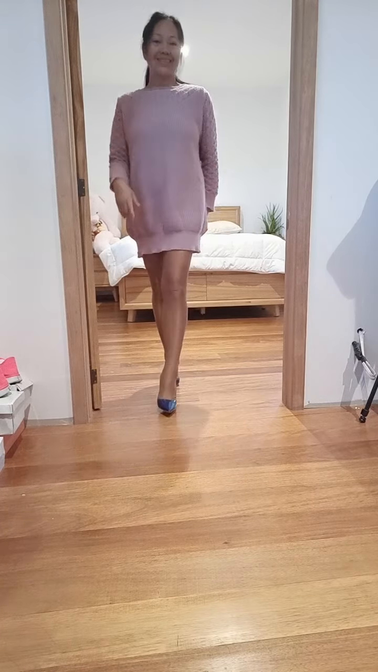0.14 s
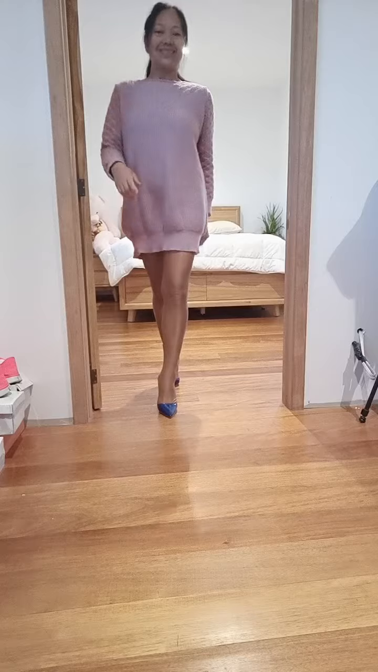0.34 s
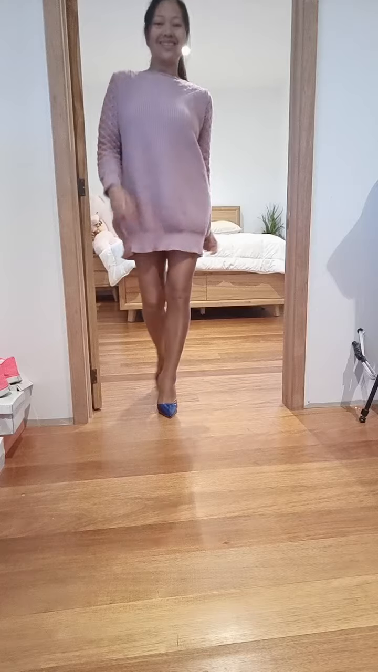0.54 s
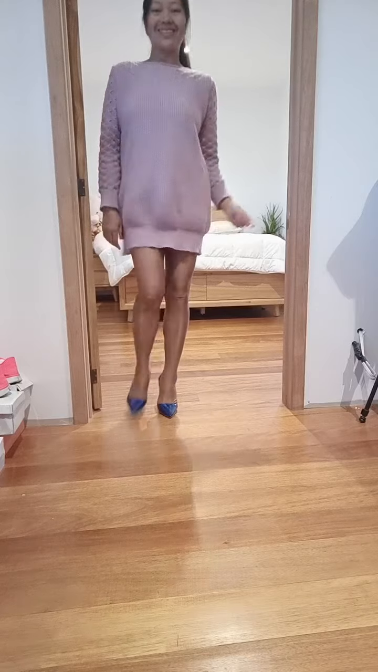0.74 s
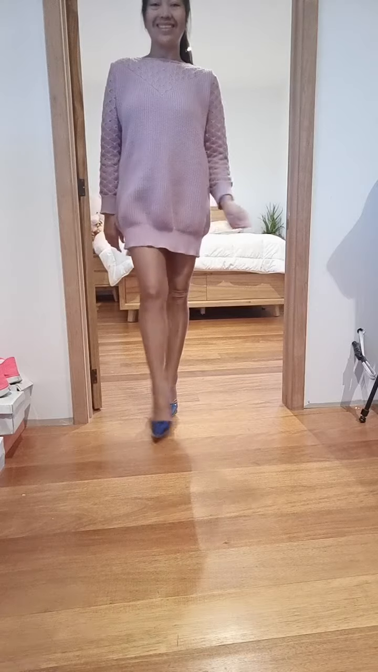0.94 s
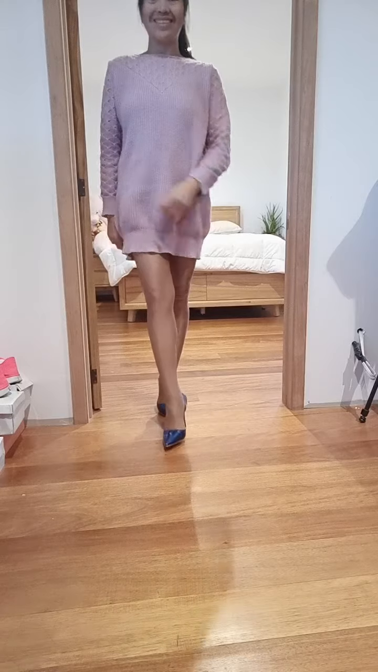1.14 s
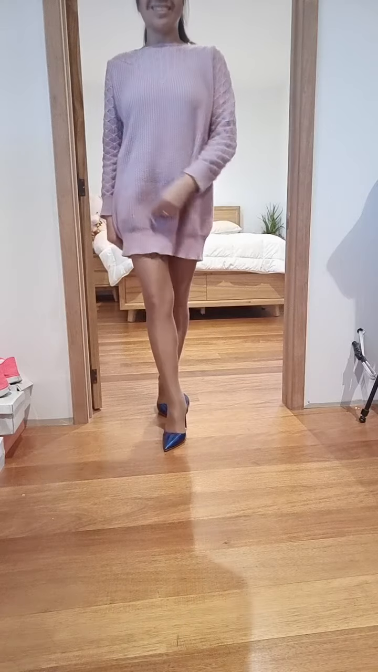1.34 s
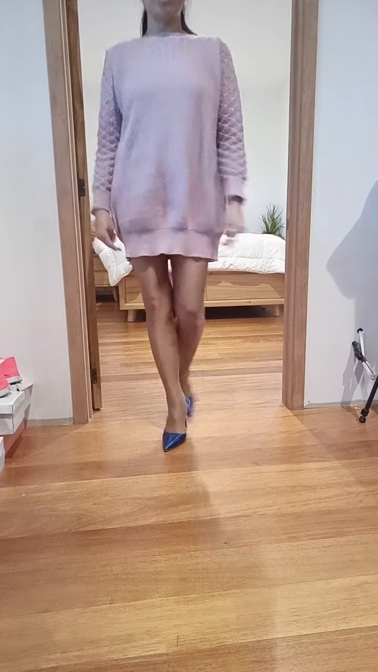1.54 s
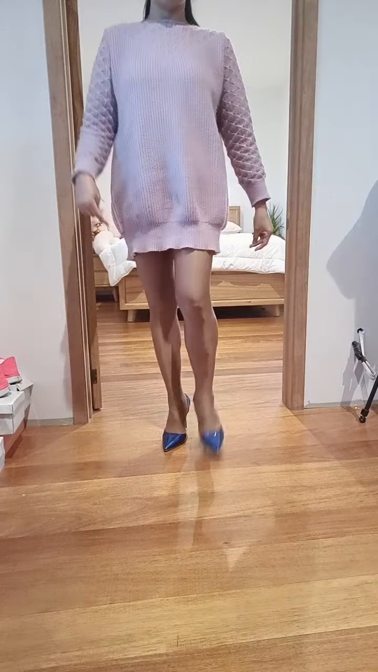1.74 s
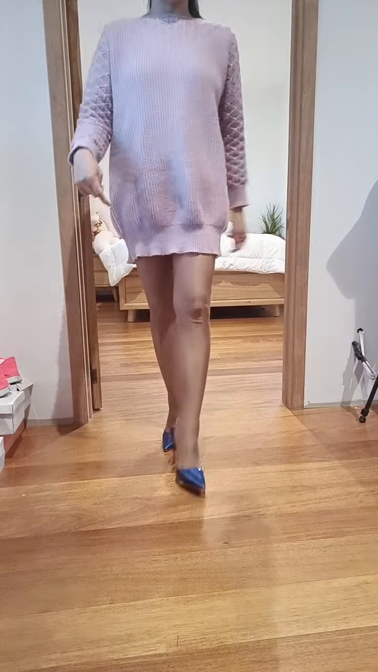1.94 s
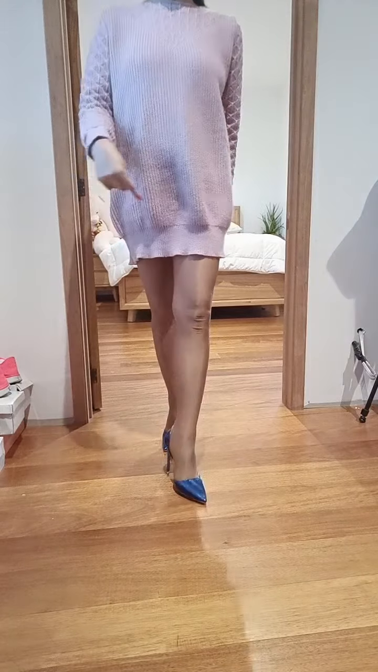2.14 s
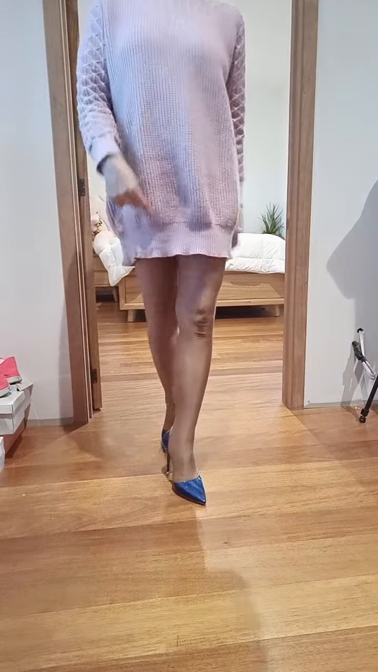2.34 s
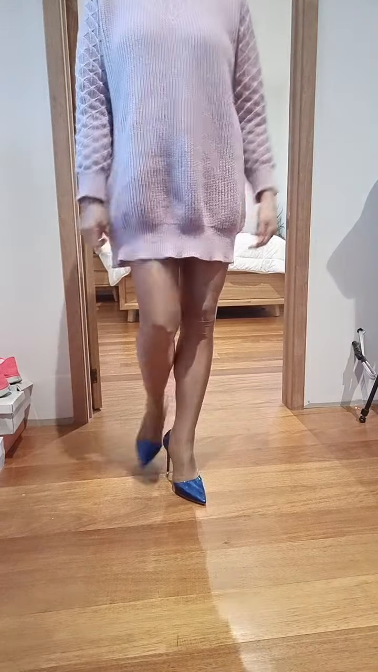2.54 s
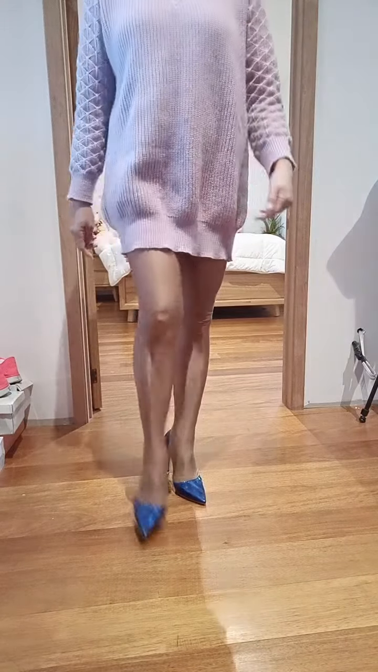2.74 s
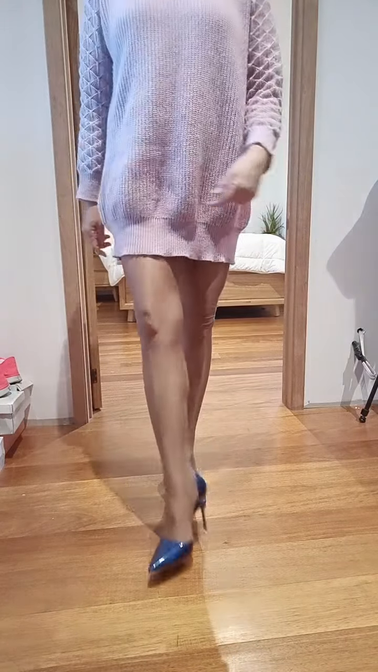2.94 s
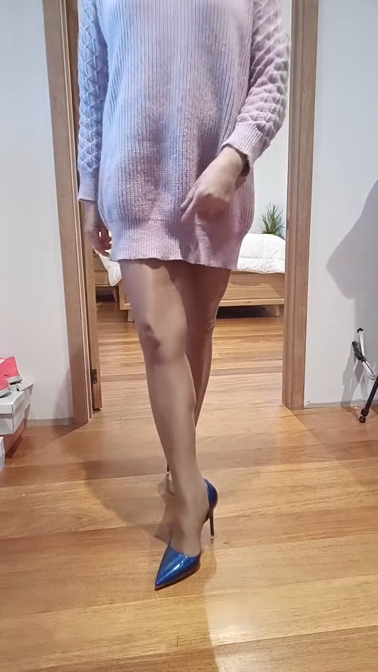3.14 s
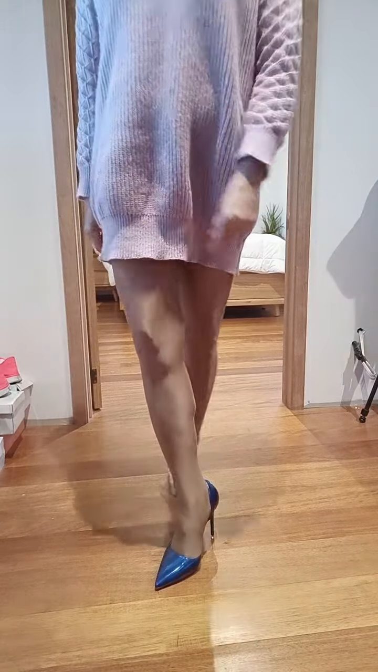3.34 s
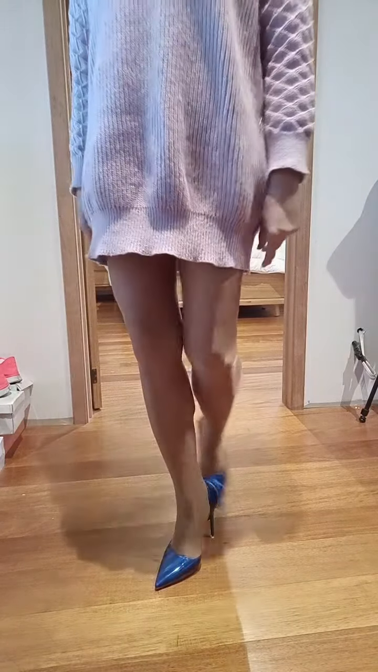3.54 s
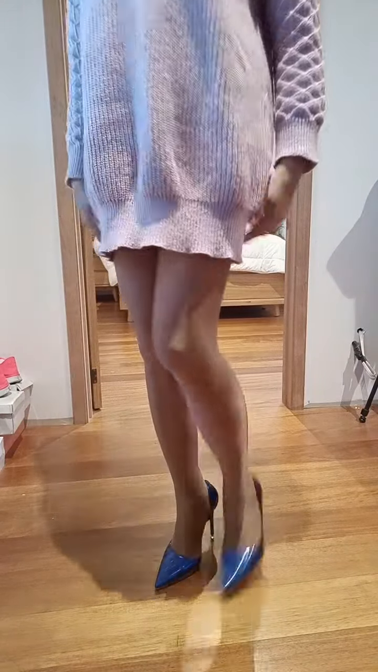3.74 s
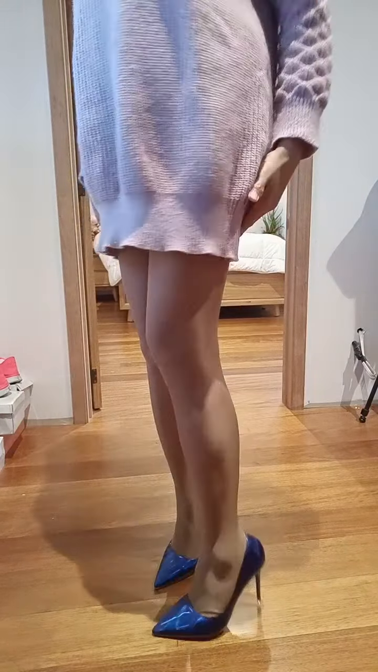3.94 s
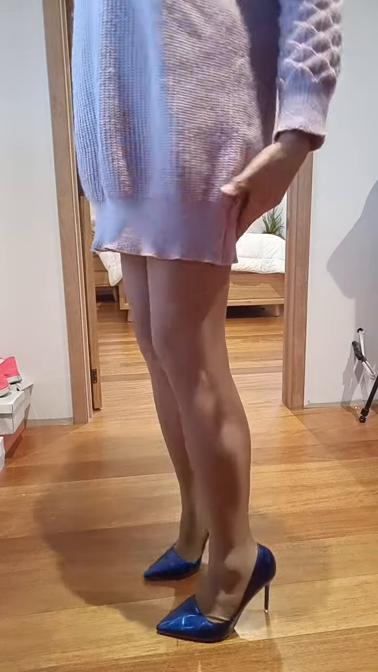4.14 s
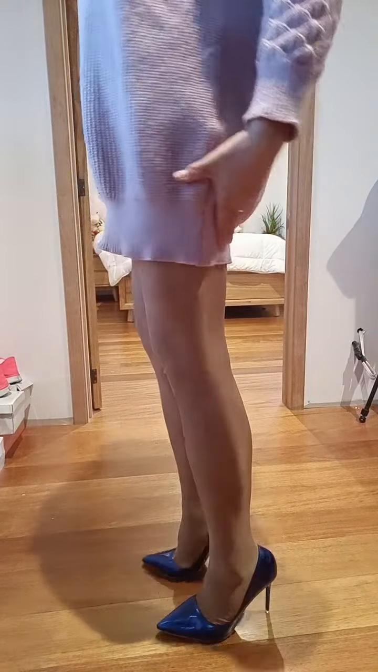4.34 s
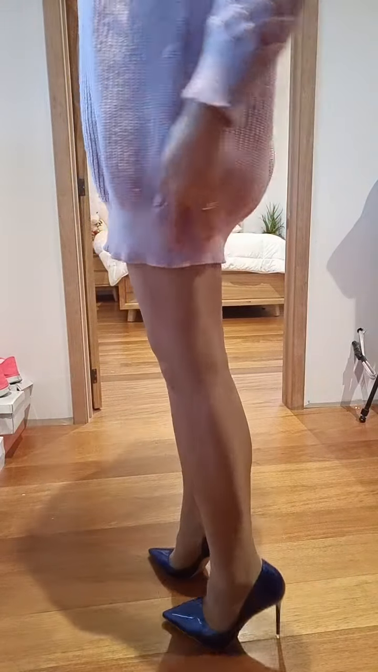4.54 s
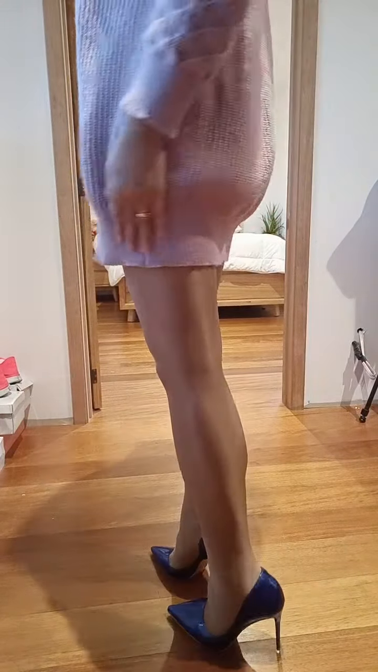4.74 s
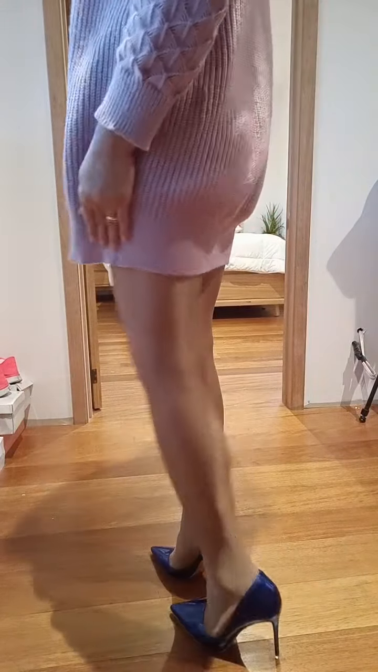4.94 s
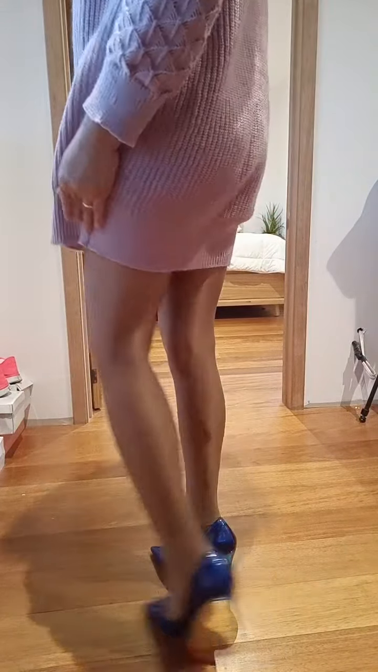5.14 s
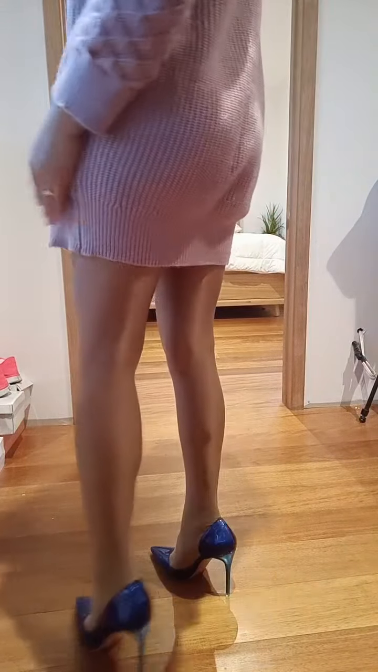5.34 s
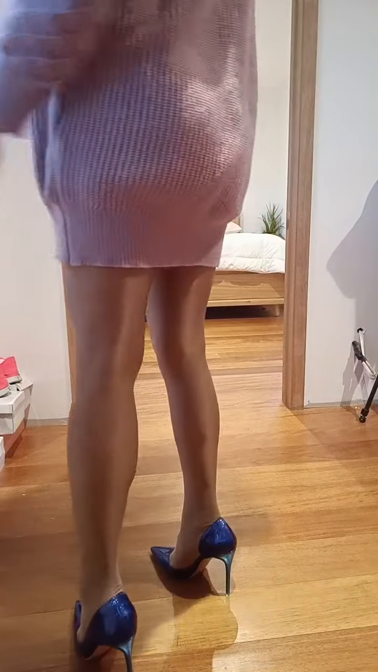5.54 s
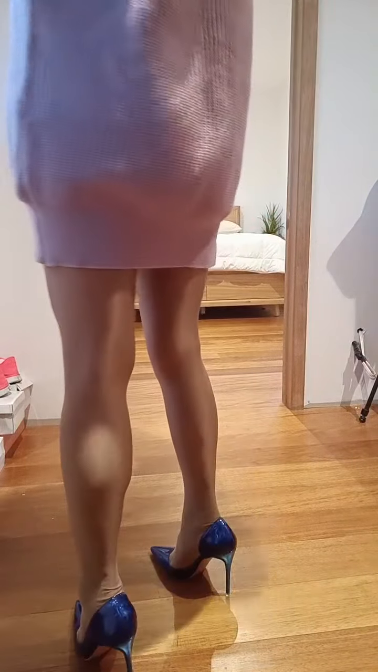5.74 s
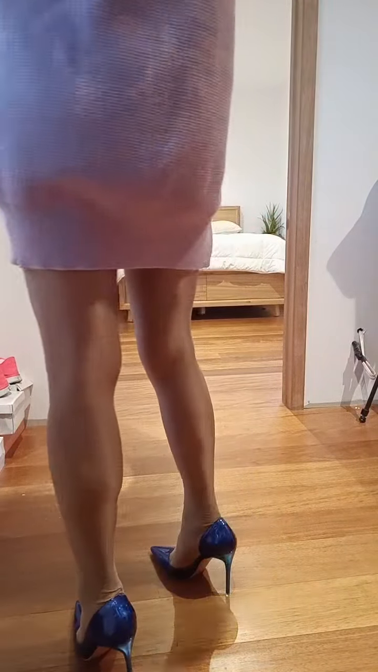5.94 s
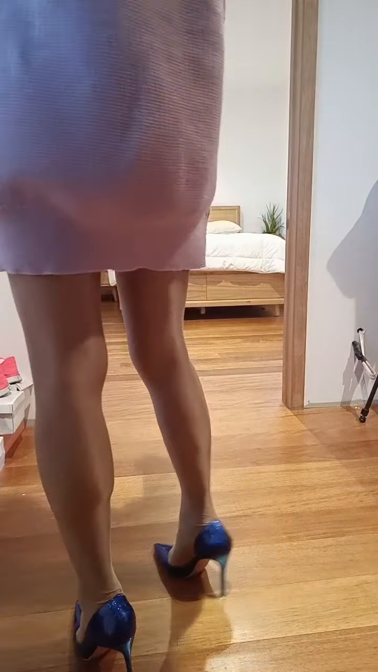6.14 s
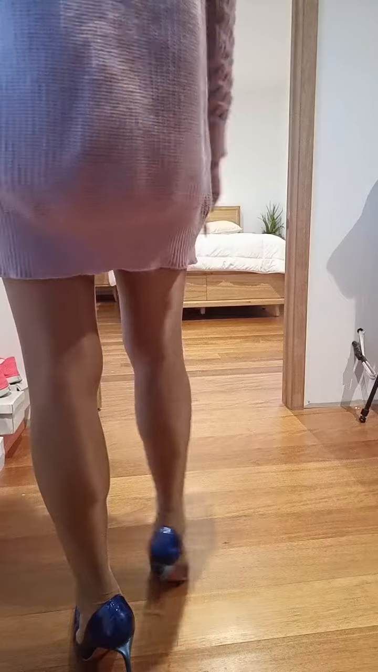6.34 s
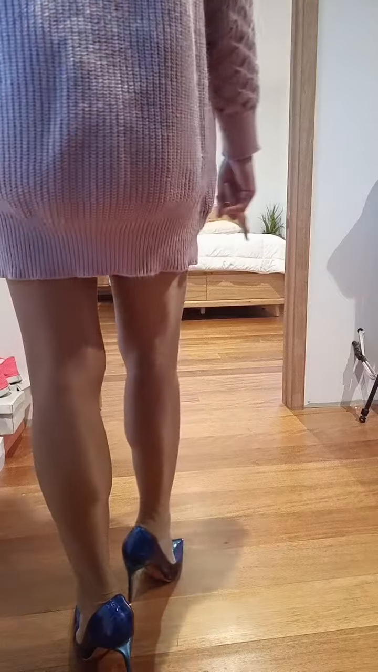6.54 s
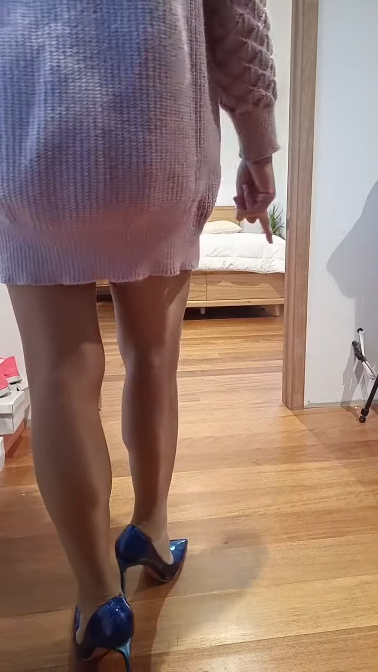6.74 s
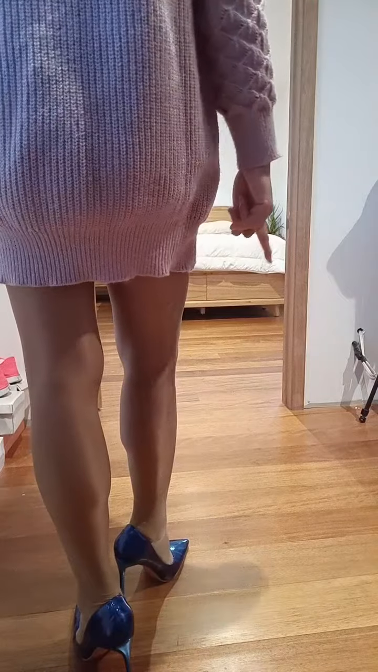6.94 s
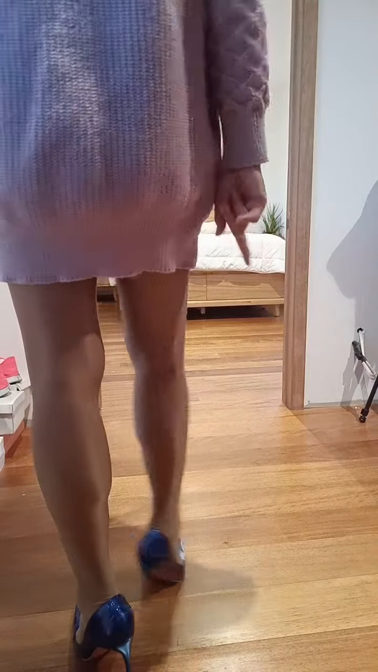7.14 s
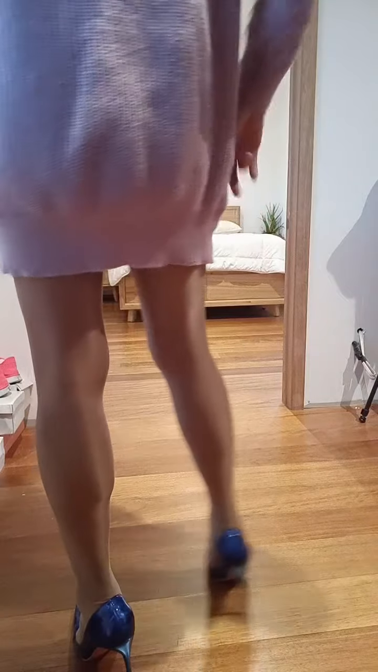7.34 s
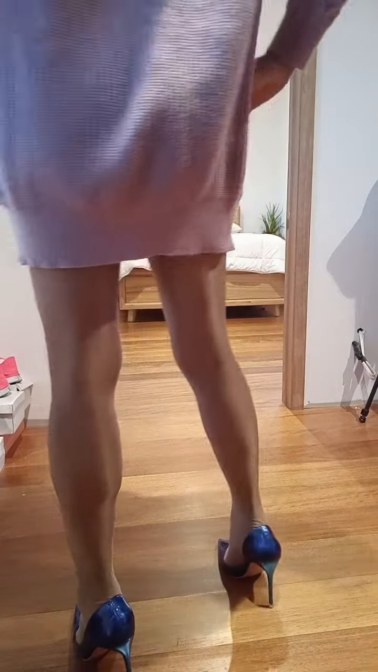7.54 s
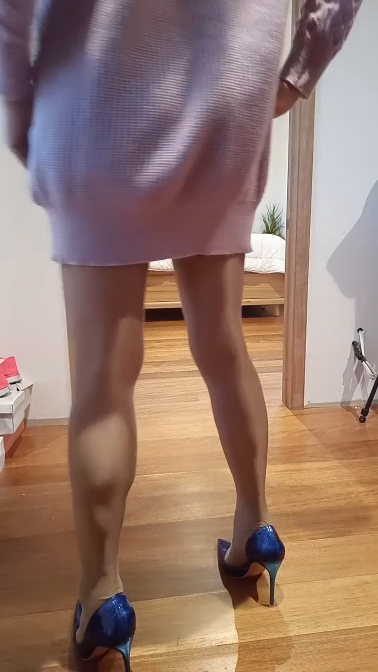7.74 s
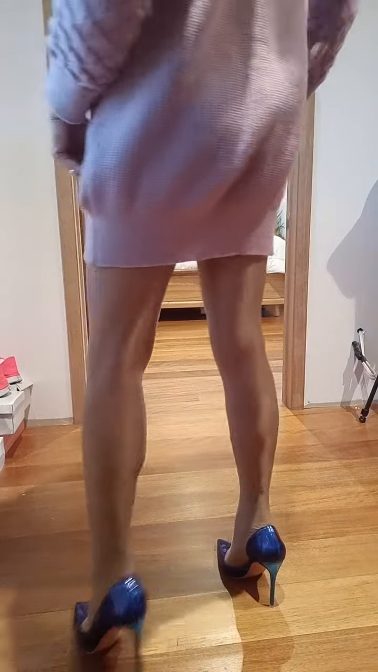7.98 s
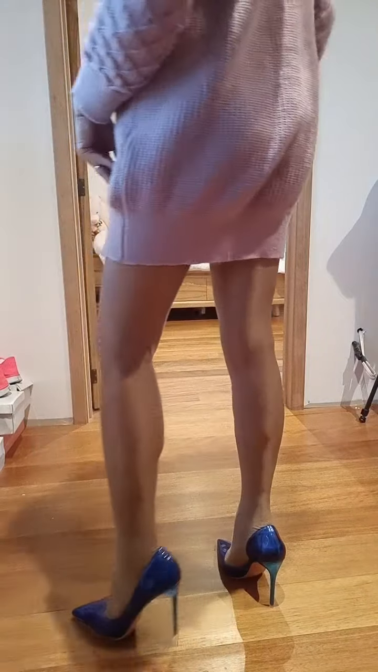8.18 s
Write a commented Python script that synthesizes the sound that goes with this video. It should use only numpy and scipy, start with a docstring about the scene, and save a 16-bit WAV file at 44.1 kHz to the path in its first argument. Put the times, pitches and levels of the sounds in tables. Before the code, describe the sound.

Slow, uneven high-heel steps on a hard timber floor approach the microphone in a quiet home. Each has a crisp click, woody knock and low floor thump with a short room echo. Once close, the shoes shift from foot to foot with faint knit rustle. After a near-quiet pause come lighter taps, a short hissing sole drag, then a quick skipping heel rattle.

```python
"""Stiletto heels walk slowly over a timber floor, come closer, then shift from foot to foot in a quiet room.
Each blow excites five filtered voices: joist thump, board ring, shoe knock, heel click and a bright tick;
echoes and diffuse decay answer it. A sole drags as shaped friction noise before the last, skipping heel.
A knitted dress rustles as grainy noise swelling with the movement, over still air and microphone hiss."""
import sys
import numpy as np
from scipy import signal
from scipy.fft import rfft, irfft, next_fast_len
from scipy.io import wavfile

SR = 44100
rng = np.random.default_rng(int(sys.argv[2]) if len(sys.argv) > 2 else 0)


def transcribe(signal):
    """Save signal, clipped to [-1, 1], as a 16-bit WAV file at the path in sys.argv[1]."""
    frames = np.atleast_2d(signal).T
    limited = np.clip(frames, -1, 1)
    pcm = np.round(limited * 32767).astype(np.int16)
    wavfile.write(sys.argv[1], SR, pcm)


N = 362061   # length [samples]
TAIL = SR // 2   # room answer kept after each blow [samples]
CUTOFF_HZ = 16000

# Resonances of the floor on its joists, the boards, the knocking shoe and the hard heel:
# (frequency [Hz], width [Hz], relative level [dB])
JOIST_MODES = [(46.5, 32, 3), (67, 90, -1.5), (95.7, 35, 2), (119, 47, -1.5), (148, 17, -13)]
BOARD_MODES = [(183, 36, 1), (214, 19.7, 4), (264.8, 20, 3), (323, 17, -11), (404.3, 18, -4)]
KNOCK_MODES = [(458, 50, 1), (515, 36, -1.5), (662, 55, 2.5), (791, 17, 2), (840, 14, -8.5),
               (949.3, 30, -4), (1208, 30, -1)]
HEEL_MODES = [(1390, 164, 3), (1694, 12.5, 9.5), (1927, 21, 6), (2100, 60, 4), (2284, 12, 11),
              (2380, 67, 7), (2815, 13, -3), (3717, 22, 0), (4010, 18, 1), (4290, 50, -1.5),
              (5380, 130, 9.5)]

# Early reflections from ceiling, walls and door frame, before they wander with each step:
# (delay [s], gain [ratio], lag at the left microphone [samples])
ECHOES = [(.0028, 0.35, 0), (.0046, 0.3, 2), (.0069, -.7, 7), (0.0128, 0.2, -9.5), (0.0151, 0.43, 7.5),
          (0.0171, -0.46, 6), (.021, 0.33, -5), (0.037, -0.27, -2.5)]

# Noise colours of knitwear, skimming sole, scraping sole and still air with microphone hiss:
# (frequency [Hz], relative density [dB per Hz])
KNIT_COLOUR = [(200, -15.5), (700, -7), (1200, -11.5), (2400, -7), (4200, -6), (6500, -13.5), (11000, -18),
               (16000, -14)]
HISS_COLOUR = [(1500, -18), (3000, -1.5), (4200, 2.5), (5500, -4.5), (7000, -12.5), (11000, -7.5),
               (15500, -12.5)]
SCRAPE_COLOUR = [(100, -15.5), (250, 1), (500, -9), (800, 1), (1300, -9), (2400, -4.5), (3300, -11),
                 (5000, -38.5)]
STILL_COLOUR = [(25, -4.5), (50, 4.5), (110, -4.5), (220, -8.5), (400, -12), (650, -10.5), (1200, -17.5),
                (3500, -23), (6500, -41.5), (10000, -31), (14000, -19.5), (16000, -27)]
STILL_DB = -69

# Likeness of left and right in diffuse sound: (frequency [Hz], shared power [ratio])
LIKENESS = [(60, 0.63), (200, 0.55), (450, .65), (900, 0.34), (3000, 0.12), (12000, 0.083)]
# The walker's way: (time [s], distance from the microphones [m])
DISTANCE = [(0, 4.8), (2.0, 3.3), (3.0, 2.7), (4.0, 2.4), (8.2, 2.5)]
LEFT_LAG_SAMPLES = 9.03
# Treble colour of the two microphone ports: (frequency [Hz], left minus right [dB])
PORTS = [(60, -0.7), (1300, 0), (2400, 0.3), (4400, -7), (6200, 0.5), (8100, 2), (11000, 0), (14500, -18.5)]
BEND_LAG_SAMPLES, BEND_HZ = 4, 1400   # extra left lag of low sound, fading out above BEND_HZ

# Heel tip strikes; edge is positive on the rim, negative when flat: (time [s], strength [dB],
# weight [dB], hardness [dB], knock pitch of that spot [Hz], edge [dB])
HEEL_STRIKES = [(0.2615, -35, -1.5, -7.3, 830, 2), (0.508, -64, 22.5, 3.3, 800, 6),
                (1.194, -32, -5, -6.2, 680, -13), (2.08, -37, 0, -8, 720, -1), (2.177, -43, -8, -7, 530, 4),
                (2.824, -52, -30, 3.5, 837, 5), (3.081, -26, -4.5, -10, 760, 6),
                (3.165, -30.5, -11.5, -4, 630, 1), (3.9503, -35, -6, -0.3, 672, -1),
                (4.267, -30, -20, -6, 530, 2), (4.324, -34.5, -13, -2.3, 676, -1),
                (4.603, -46, -7, 1, 580, 0), (5.407, -33.5, -4.5, -0.3, 740, -5)]
# The sole comes down, or knocks as it catches in the drag (7.208, 7.243):
# (time [s], strength [dB], weight [dB], hardness [dB], knock pitch of that spot [Hz])
SOLE_CONTACTS = [(0.108, -41, 1.5, -24, 700), (1.148, -45, 5, -7.5, 1000), (1.288, -42.5, -2.5, -3, 634),
                 (2.018, -35.5, -1.5, -18, 700), (3.673, -55, -12, 7, 610), (4.074, -37, -7, -6.5, 560),
                 (4.505, -50, 2, -6, 590), (5.483, -35, -4.5, -4.5, 740), (6.101, -44.5, -12.5, 4.5, 500),
                 (6.595, -51, -6, -17, 752), (7.208, -73, -12, 19.5, 960), (7.243, -72, -12, 17, 680),
                 (7.631, -41.5, -6, -5.5, 690)]
# Force sharing, one row each for knock, click, tick: (level against the boards [dB], gain [dB per dB hardness])
HEEL_SHARES = [(2.5, 1.0), (0.9, 2.0), (-11.5, 2.0)]
SOLE_SHARES = [(0.4, 1.0), (-16, 0.8), (-31, 0.6)]
SKIP_SHARES = [(8.3, 1.0), (0.7, 1.9), (-11, 3.0)]
TICK_LOSS_DB_PER_M = 5.5   # beyond the nearest spot the top of the tick fades
HEEL_CLICK_HZ, SOLE_CLICK_HZ, CLICK_HZ_PER_EDGE_DB = 2380, 1680, 55
BOARD_HZ, BOARD_SAG_HZ_PER_DB, BOARD_HZ_PER_HARD_DB, BOARD_RANGE_HZ = 232, 5.5, 2.4, (185, 335)

# First touch of the slanted last heel: (time [s], strength [dB], weight [dB], hardness [dB],
# knock pitch [Hz], edge [dB])
SKIP_FIRST = (7.6775, -39, -13, 0, 830, 0)
# Change with each further touch: (strength [dB], weight [dB], hardness [dB])
SKIP_CHANGE = (-3.3, 4.7, 1.2)
SKIP_GAP_S, SKIP_GAP_RATIO = .0253, .77   # first gap; each next gap is shorter by the ratio

# The joists give as weight rolls onto one foot: (time [s], level [dB])
SETTLES = [(1.412, -59), (1.513, -59.5), (2.28, -59.5), (2.419, -63.5), (3.336, -56.5), (3.512, -59.5),
           (4.94, -62.5), (5.02, -66)]
# The shoe ticks as it flexes or lifts off: (time [s], click level [dB])
FLEXES = [(1.32, -66), (2.937, -62), (3.015, -72), (3.336, -72), (5.465, -51), (5.962, -66)]
FLEX_KNOCK_DB, FLEX_TICK_DB = -8, -6   # against the click
FLEX_KNOCK_HZ, FLEX_CLICK_HZ = 770, 3200

# Knitwear swishes with each swing of a leg or arm:
# (middle time [s], level before the dress gain [dB], half length [s])
SWISHES = [(0.58, -65.5, .24), (1.52, -58, .1), (2.43, -61, .17), (3.5, -60.5, .24), (4.36, -53.5, .28),
           (4.88, -62.5, .2), (5.095, -58.5, .055), (5.35, -64.5, .22), (6.24, -60.5, .08),
           (6.66, -67, .06), (7.96, -64, .2), (8.21, -56, .05)]
SWISH_SHAPE = 1.5   # 1 is pointed, 2 bell-shaped
KNIT_REST_DB = -76.5   # faint rubbing between swings, before the dress gain

# The dragged sole, first light, then loaded: (fully on at [s], level before its gain [dB],
# hold [s], rise [dB per s], fall [dB per s])
SKIM = (7.208, -50, .09, 210, 95)
GRIND = (7.355, -49, .04, 110, 185)
LOAD_FROM_S, LOAD_S, LOADED_HISS_HZ = 7.25, .2, 4800   # the hiss darkens as weight comes onto the sole


def from_db(db):
    """Amplitude ratio of a level in dB."""
    return 10 ** (np.asarray(db) / 20)


def rms(x):
    """Effective amplitude, kept above zero."""
    return np.sqrt(np.mean(x ** 2) + 1e-24)


def at_hz(points, hz):
    """Read a frequency table along a logarithmic pitch axis."""
    table_hz, values = np.transpose(points)
    return np.interp(np.log(hz + 1), np.log(table_hz), values)


def cut(x, hz, kind, order=2):
    """Butterworth filter."""
    sos = signal.butter(order, np.minimum(hz, .45 * SR), kind, fs=SR, output="sos")
    return signal.sosfilt(sos, x)


def around(x, hz, octaves):
    """A soft band about a centre."""
    edges_hz = hz * 2 ** (np.array([-.5, .5]) * octaves)
    return cut(x, edges_hz, "band")


def resonate(x, modes, plain_db):
    """Parallel resonances on top of the plain, forced motion of the body."""
    out = from_db(plain_db) * x
    for hz, width, db in modes:
        radius = np.exp(-np.pi * width / SR)
        top = from_db(db) * (1 - radius * radius) / 2
        poles = [1, -2 * radius * np.cos(2 * np.pi * hz / SR), radius * radius]
        out = out + signal.lfilter([top, 0, -top], poles, x)
    return out


def diffuse(size, spectrum=None):
    """Stereo noise: a shared part from the walker's side, the rest from everywhere; rms 1."""
    padded = next_fast_len(size, True)
    hz = np.arange(padded // 2 + 1) * SR / padded
    noises = rfft(rng.standard_normal((3, padded)))
    alike = np.clip(at_hz(LIKENESS, hz), 0, 1)
    lags = np.array([[LEFT_LAG_SAMPLES], [0]])
    shared = noises[2] * np.exp(-2j * np.pi * hz / SR * lags)
    both = np.sqrt(alike) * shared + np.sqrt(1 - alike) * noises[:2]
    if spectrum is not None:
        bass_fade = np.minimum(hz / spectrum[0][0], 1) ** 2
        both = both * from_db(at_hz(spectrum, hz)) * bass_fade
    noise = irfft(both, padded)[:, :size]
    return noise / rms(noise)


def still_air():
    """Steady diffuse noise: still air of the room and microphone hiss."""
    return from_db(STILL_DB) * diffuse(N, STILL_COLOUR)


def grain(per_s, depth_db):
    """Uneven gain of rubbing surfaces that catch and let go."""
    knots = rng.standard_normal(N // 20)
    place = np.arange(N) * per_s / SR
    return from_db(depth_db * np.interp(place, np.arange(len(knots)), knots))


def dress(gain_db=1.5):
    """Soft, finely grained rubbing of wool that swells with each swing."""
    t = np.arange(N) / SR
    power = from_db(KNIT_REST_DB) ** 2
    for s, db, half_s in SWISHES:
        swell = np.exp(-np.abs((t - s) / half_s) ** SWISH_SHAPE)
        power = power + (from_db(db) * swell) ** 2
    rubbing = grain(per_s=63, depth_db=1.0) * diffuse(N, KNIT_COLOUR)
    return from_db(gain_db) * np.sqrt(power) * rubbing


def stroke(s, db, hold_s, rise_db_per_s, fall_db_per_s):
    """Gain of one rub: it swells, holds and dies."""
    t = np.arange(N) / SR - s
    rise_db = rise_db_per_s * np.maximum(-t, 0)
    fall_db = fall_db_per_s * np.maximum(t - hold_s, 0)
    return from_db(db - rise_db - fall_db)


def dragged_sole(hiss_gain_db=5.0, scrape_gain_db=2.0):
    """The sole first skims with a hiss, then takes weight and scrapes in small catches."""
    catches = grain(per_s=110, depth_db=1.6) * grain(per_s=700, depth_db=2.2)
    skim = from_db(hiss_gain_db) * stroke(*SKIM) * np.sqrt(catches) * diffuse(N, HISS_COLOUR)
    load = np.clip((np.arange(N) / SR - LOAD_FROM_S) / LOAD_S, 0, 1) ** 2
    skim = (1 - load) * skim + load * cut(skim, LOADED_HISS_HZ, "low", order=1)
    grind = from_db(scrape_gain_db) * stroke(*GRIND) * catches * diffuse(N, SCRAPE_COLOUR)
    # friction sets the same shoe ringing as a blow does; its overall level is kept
    friction = skim + grind
    rubbed = resonate(friction, HEEL_MODES, plain_db=7.5)
    return rubbed * rms(friction) / rms(rubbed)


def arrival(delay_s, lag):
    """One click reaching the two microphones, the left one later by lag samples."""
    at = delay_s * SR + np.array([[lag], [0]])
    return np.maximum(1 - np.abs(np.arange(TAIL) - at), 0)


def reflections(wander=.07, uneven_db=0.5):
    """Early echoes whose delays and gains shift randomly with each step."""
    out = np.zeros((2, TAIL))
    for delay_s, gain, lag in ECHOES:
        shift, lift = rng.standard_normal(2)
        out += gain * from_db(uneven_db * lift) * arrival(delay_s * (1 + wander * shift), lag)
    return out


def reverberation(noise, wet_db, t60, late_db, late_t60, build_s=0.003):
    """A quick decay of the near walls and a slower one of the rooms beyond."""
    t = np.arange(TAIL) / SR
    decay = from_db(-60 * t / t60) + from_db(late_db - 60 * t / late_t60)
    fall = decay * (1 - np.exp(-t / build_s))
    return from_db(wet_db) * noise * fall / np.sqrt(np.sum(fall ** 2))


def contact(room, metres, board_hz, knock_hz, click_hz, wall_hz=7000, near_m=2.0):
    """The five voices of one blow as they arrive through the room, each with rms 1 over its first 40 ms."""
    direct = -arrival(0, LEFT_LAG_SAMPLES) * near_m / metres
    early = direct - cut(reflections(), wall_hz, "low", order=1)
    # half of the room's pattern is the same for every step, half changes with the spot
    noise = (room + diffuse(TAIL)) * np.sqrt(.5)

    # the thump travels through the floor itself: no distinct echoes, nearly the same at both microphones
    floor_noise = .68 * noise.mean(axis=0) + .32 * noise
    rumble = reverberation(floor_noise, wet_db=-4, t60=.16, late_db=-27, late_t60=.9)
    thump = resonate(direct + rumble, JOIST_MODES, plain_db=-11)
    thump = cut(thump, [46, 128], "band", order=3)

    board = early + reverberation(noise, wet_db=-1.5, t60=.22, late_db=-33.5, late_t60=.7)
    board = around(resonate(board, BOARD_MODES, plain_db=-3.5), board_hz, octaves=1.09)

    knock = early + reverberation(noise, wet_db=0, t60=.28, late_db=-14.5, late_t60=.48)
    knock = resonate(knock, KNOCK_MODES, plain_db=-1)
    knock = cut(knock, knock_hz * np.array([.62, 1.3]), "band", order=3)

    click = early + reverberation(noise, wet_db=4, t60=.175, late_db=-12, late_t60=.35)
    click = around(resonate(click, HEEL_MODES, plain_db=3), click_hz, octaves=1.71)
    click = cut(click, 4920, "low", order=4)

    tick = early + reverberation(noise, wet_db=3.5, t60=.135, late_db=-10, late_t60=.28)
    tick = cut(cut(tick, [5200, 15800], "band", order=3), 12000, "low", order=1)

    attack = SR // 25
    return [voice / rms(voice[:, :attack]) for voice in (thump, board, knock, click, tick)]


def distance_at(s):
    """The walker's distance in metres at a given second."""
    return np.interp(s, *np.transpose(DISTANCE))


def small_sounds():
    """A settling foot moves only the joists, a flexing shoe only itself."""
    off, pitches = -np.inf, (BOARD_HZ, FLEX_KNOCK_HZ, FLEX_CLICK_HZ)
    for s, db in SETTLES:
        yield s, [db, off, off, off, off], pitches
    for s, db in FLEXES:
        yield s, [off, off, db + FLEX_KNOCK_DB, db, db + FLEX_TICK_DB], pitches


def skips(count=4):
    """Touches of the skipping heel: weaker, but carrying more weight each time."""
    s, db, weight, hardness, knock_hz, edge = SKIP_FIRST
    for k in range(count):
        force = np.add((db, weight, hardness), k * np.array(SKIP_CHANGE))
        yield (s, *force, knock_hz, edge)
        s = s + SKIP_GAP_S * SKIP_GAP_RATIO ** k


def blows(rows, shares, click_hz):
    """Weight drives the joists and lowers the boards, hardness brings out the shoe, edge sharpens it."""
    offset, slope = np.transpose(shares)
    nearest = min(metres for _, metres in DISTANCE)
    for s, db, weight, hardness, knock_hz, edge in rows:
        knock, click, tick = db + offset + slope * hardness
        tick = tick + edge - TICK_LOSS_DB_PER_M * (distance_at(s) - nearest)
        board_hz = BOARD_HZ - BOARD_SAG_HZ_PER_DB * weight + BOARD_HZ_PER_HARD_DB * hardness
        board_hz = np.clip(board_hz, *BOARD_RANGE_HZ)
        levels = [db + weight, db, knock, click, tick]
        yield s, levels, (board_hz, knock_hz, click_hz + CLICK_HZ_PER_EDGE_DB * edge)


def steps():
    """Every contact shares its force among joists, boards, knock, click and tick."""
    out, room = np.zeros((2, N + TAIL)), diffuse(TAIL)
    heels = blows(HEEL_STRIKES, HEEL_SHARES, HEEL_CLICK_HZ)
    edgeless_soles = [(*row, 0) for row in SOLE_CONTACTS]   # a sole has no edge
    soles = blows(edgeless_soles, SOLE_SHARES, SOLE_CLICK_HZ)
    skipping = blows(skips(), SKIP_SHARES, HEEL_CLICK_HZ)
    for s, levels, pitches in [*heels, *soles, *skipping, *small_sounds()]:
        voices = contact(room, distance_at(s), *pitches)
        at = round(s * SR)
        out[:, at:at + TAIL] += sum(gain * voice for gain, voice in zip(from_db(levels), voices))
    return out[:, :N]


def through_ports(x):
    """Sound enters the two ports with a different colour; low sound reaches the left one later still."""
    padded = next_fast_len(N + TAIL, True)
    hz = np.arange(padded // 2 + 1) * SR / padded
    sides = np.array([[.5], [-.5]])
    gains = from_db(at_hz(PORTS, hz) * sides)
    gains = gains / np.sqrt(np.mean(gains ** 2, axis=0))   # keeps the mean power of both sides
    lag = sides * BEND_LAG_SAMPLES * np.exp(-(hz / BEND_HZ) ** 2)
    bend = np.exp(-2j * np.pi * hz / SR * lag)
    return irfft(rfft(x, padded) * bend * gains, padded)[:, :N]


def scene():
    """Dress, dragged sole and steps enter the ports; still air and hiss lie beneath."""
    return still_air() + through_ports(dress() + dragged_sole() + steps())


def record(dry):
    """The microphone drops the deepest bass; the top is cut."""
    without_rumble = cut(dry, 21, "high")
    top_cut = signal.ellip(10, .2, 70, CUTOFF_HZ, fs=SR, output="sos")
    return signal.sosfilt(top_cut, without_rumble)


dry = scene()
out = record(dry)
transcribe(out)
```